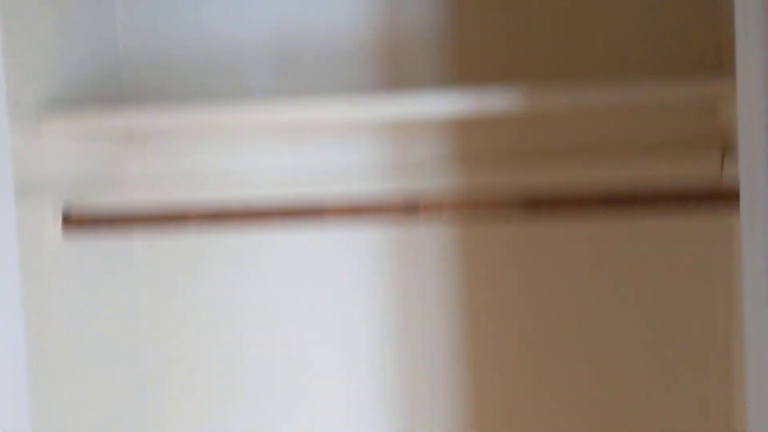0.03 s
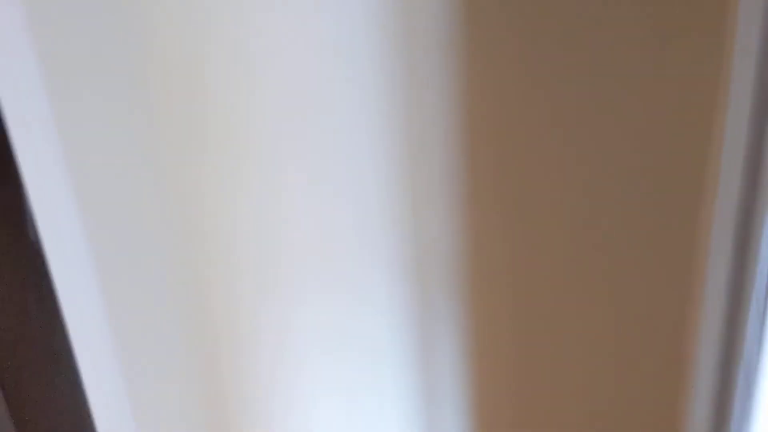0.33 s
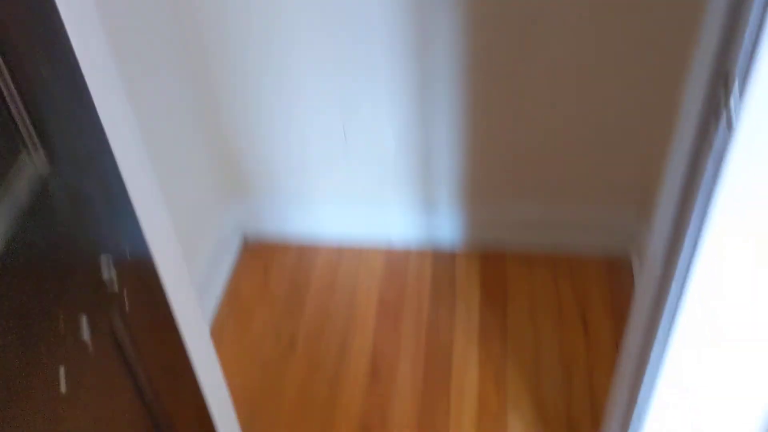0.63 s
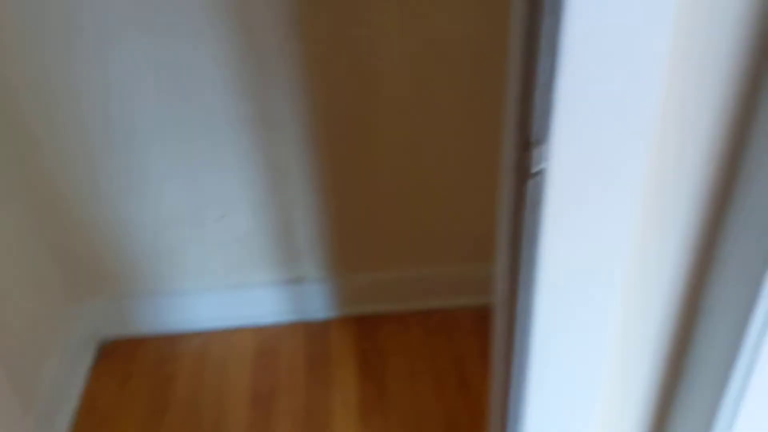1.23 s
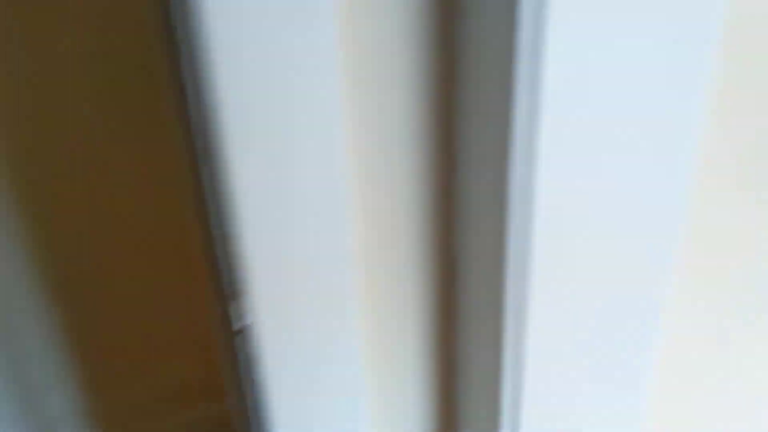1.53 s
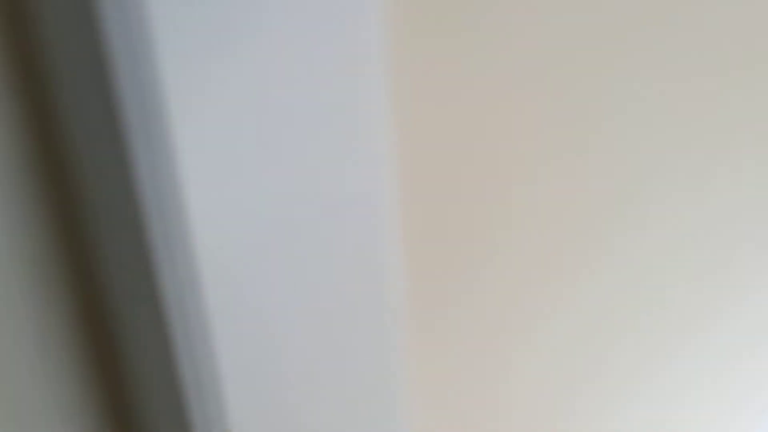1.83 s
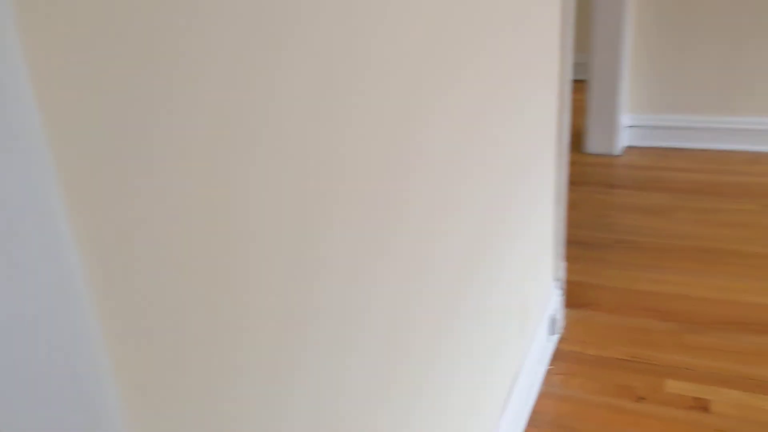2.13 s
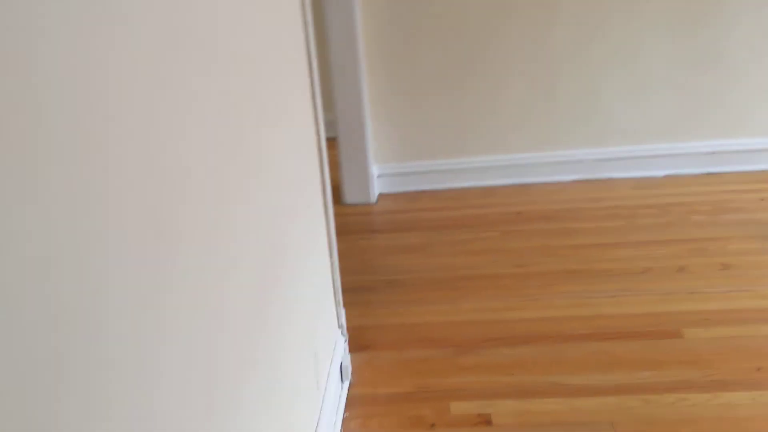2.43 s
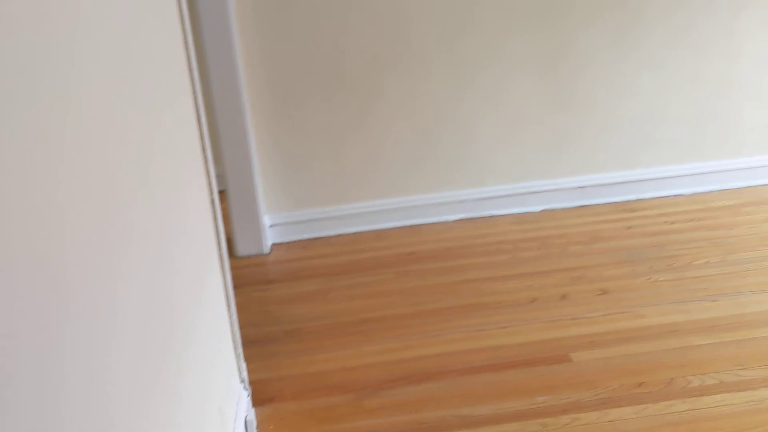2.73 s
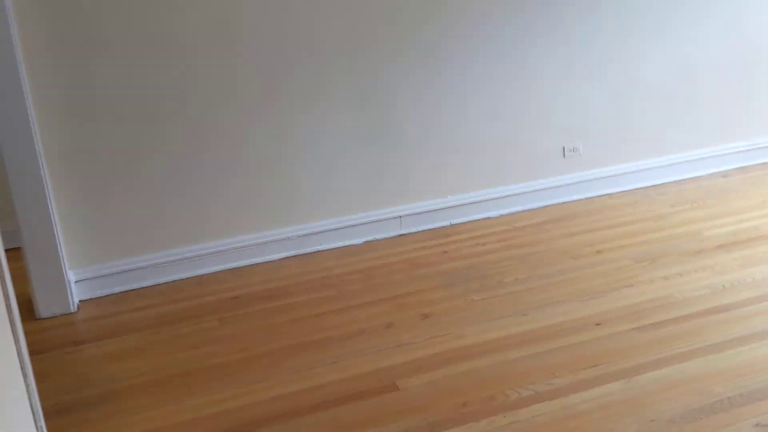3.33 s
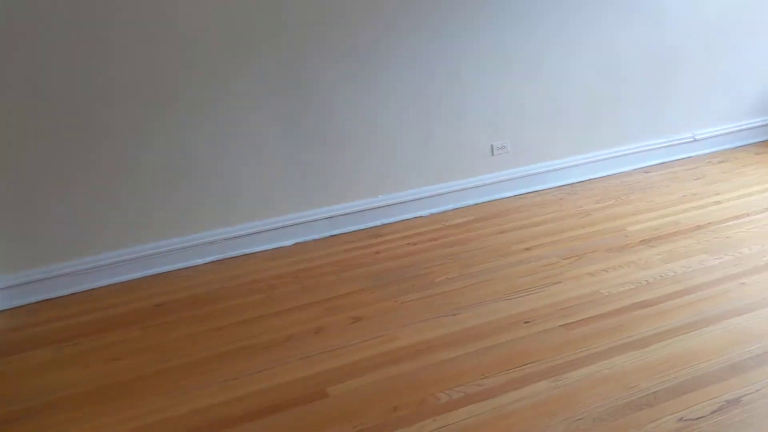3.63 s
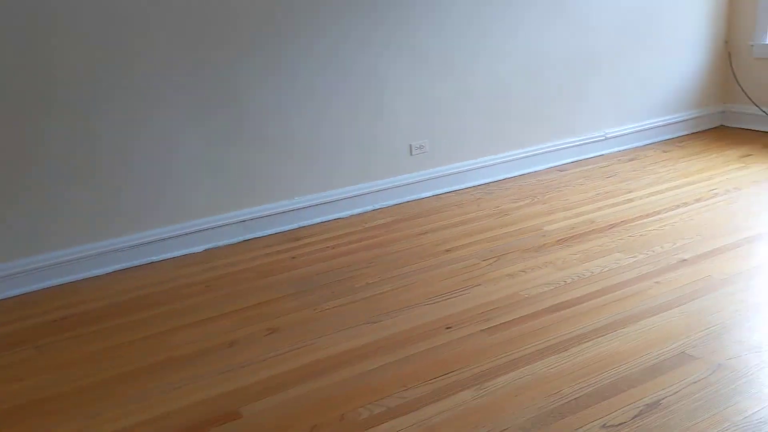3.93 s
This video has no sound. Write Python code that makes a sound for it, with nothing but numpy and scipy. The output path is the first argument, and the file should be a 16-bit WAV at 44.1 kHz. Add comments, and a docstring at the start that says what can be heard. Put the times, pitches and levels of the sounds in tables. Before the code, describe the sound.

A sharp, loud wooden knock with a deep thud lands at about 3 seconds and echoes briefly in an empty room. Before it, light shoe taps fall on a wooden floor near 0.4 and 1.7 seconds, with soft scuffs, and a squeak slides down and turns rough from 2.4 to 2.9 seconds. Faint scuffs return near the end. A low machine hum and soft hiss run underneath.

```python
"""A knock in an empty room

Shoes tap and scuff softly on a wooden floor. Wood sticks and slips in a squeak that slides down in
pitch, then a sharp knock leaves the wood ringing and sets off a deep thud. The bare walls add a
bright echo, and a low machine hum and a faint hiss lie underneath."""
import sys
import numpy as np
from scipy import signal
from scipy.fft import rfft, irfft
from scipy.io import wavfile

SR = 44100
rng = np.random.default_rng(int(sys.argv[2]) if len(sys.argv) > 2 else 0)


def digitize_waveform(pressure):
    """Quantize a signal to 16-bit integers and store it at the path in sys.argv[1].

    Rows of a 2-D input are taken as channels; values are limited to [-1, 1].
    """
    field = np.atleast_2d(pressure).T
    bounded = np.clip(field, -1, 1)
    quanta = np.round(bounded * 32767).astype(np.int16)
    wavfile.write(sys.argv[1], SR, quanta)


N = 176400  # 4 seconds


# The hits of the knock. Each row: start in seconds, level in dB, fade time in seconds,
# brightness in dB per octave.
KNOCK_HITS = [(2.9697, -31.5, 0.0054, 7.5), (2.9731, -23, 0.0021, 3), (2.9755, -24, 0.0028, 2),
              (2.9811, -19, 0.0067, 0.3), (2.996, -24.5, 0.01, -4)]
# The tone of each hit. Each row: frequency in Hz, relative level in dB.
KNOCK_COLOUR = [(60, 4), (150, 0), (330, -0.5), (520, -2.5), (1050, -2), (1350, -6), (1900, -1.5),
                (2450, -4.5), (2900, -4), (3400, -10), (4600, -12.5), (6800, -25), (11000, -31.5),
                (15500, -35)]
# The notes of the struck wood. Each row: pitch in Hz, level in dB, seconds to fade by 60 dB.
WOOD_NOTES = [(78.4, -22, 0.41), (104, -27, 0.31), (137, -17.5, 0.15), (177.2, -30, 0.37),
              (257.8, -26.5, 0.5), (296.6, -33, 0.4), (321, -29, 0.33), (420, -34.5, 0.35),
              (455, -37.5, .18), (626, -25.5, 0.34), (1085, -30, 0.14), (1616, -25.5, 0.033),
              (1962, -25.5, 0.067), (2857, -27, 0.1)]

def knock():
    """Several hard hits blur into one crack, and the wood rings on. Only the crack echoes."""
    crack, ring = np.zeros((2, N)), np.zeros((2, N))
    for start, db, decay, tilt_db in KNOCK_HITS:
        add(crack, start, burst(KNOCK_COLOUR, db, decay, tilt_db))
    add(ring, start=2.9725, sound=ringing(WOOD_NOTES))
    return (crack + ring) * pan(3.5) + amp(-5) * echo(crack)


def thud():
    """A deep swing that holds for a few cycles, then drops to a soft rumble."""
    start, hz, db = 2.9785, 34.58, -15.5
    rise_s, hold_s, fall_s, rumble_s = 0.016, 0.14, 0.021, 0.23
    t = np.maximum(np.arange(N) / SR - start, 0)
    late = np.maximum(t - hold_s, 0)
    rumble = amp(-14.5) * np.exp(-late / rumble_s)
    level = np.minimum(t / rise_s, 1) * np.maximum(np.exp(-late / fall_s), rumble)
    return -amp(db) * level * np.sin(2 * np.pi * hz * t) * pan(2.1)


# The squeak's slide. Each row: time in seconds, pitch in Hz, relative level in dB, roughness (0 to 1).
SQUEAK_PATH = [(2.428, 2065, -56, 0.1), (2.444, 2008, -47.5, 0.14), (2.49, 1990, -43.5, 0),
               (2.514, 1956, -49, 0.2), (2.521, 1883, -52, .5), (2.56, 1825, -42, 0.52),
               (2.6, 1663, -50, 0.59), (2.645, 1520, -47.5, 0.75), (2.675, 1376, -46, 0.93),
               (2.739, 1314, -57.5, 0.89), (2.785, 1259, -49.5, 0.8), (2.825, 1221, -56, 0.74),
               (2.87, 1220, -82, 0.86)]
# How well the wood gives off each frequency. Each row: frequency in Hz, boost or cut in dB.
SQUEAK_BODY = [(1250, -3), (1600, -3), (2000, 2.5), (2700, 4), (3300, -1.5), (3700, -9), (4000, -1),
               (4600, -3.5), (5500, -3), (6000, -7.5), (7000, -9), (8000, -30), (10000, -34), (12000, -31),
               (15000, -36)]
# The dry rubbing under the squeak. Each row: frequency in Hz, relative level in dB.
RUB_COLOUR = [(500, -30), (1300, -6), (1900, 3), (2700, -1), (3700, -6), (4600, -16), (5500, 2), (6800, -8),
              (8000, -16), (15000, -28)]

def squeak():
    """Wood sticks and slips: a clean whistle that turns rough as it slows and drops."""
    times, *columns = np.transpose(SQUEAK_PATH)
    t = np.arange(times[0], times[-1], 1 / SR)
    hz, db, rough = (np.interp(t, times, column) for column in columns)
    shaky_hz = hz * (1 + 0.028 * rough * wander(len(t), hz=400))
    cycles = np.cumsum(shaky_hz) / SR
    whistle = 0
    for k in range(1, 9):  # harmonics: whole multiples of the pitch
        dulling_db = 4 * rough * (k - 1.5)
        whistle += amp(read(SQUEAK_BODY, k * hz) - dulling_db) * np.sin(2 * np.pi * k * cycles)
    rub = amp(-8.5) * rough * noise(RUB_COLOUR, size=len(t))
    flutter_db = 4.5 * rough * wander(len(t), hz=80)
    sound = np.zeros((2, N))
    add(sound, times[0], np.sqrt(2) * (whistle + rub) * amp(db + flutter_db))
    return amp(-7.5) * pan(10.5) * sound + amp(-4.5) * pan(0.83) * echo(sound)


# The shoe taps. Each row: start in seconds, level in dB, fade time in seconds, brightness in dB
# per octave, then echo and floorboard ring, both in dB compared with the tap.
TAPS = [(.436, -37, 0.0042, 4, -2.5, -21), (.45, -41, 0.0099, -0.3, -3.5, -15),
        (1.505, -49, 0.0068, 12, -2, -25), (1.622, -33.5, 0.0068, -10, -0.5, -14),
        (1.7232, -34.5, .005, -6.5, -4.5, -4.5), (1.748, -38, 0.01, 1.5, -3.5, -5),
        (2.58, -48, 0.0071, -7, -9, -13)]
# The tone of a tap. Each row: frequency in Hz, relative level in dB.
TAP_COLOUR = [(100, -14), (350, -16), (900, 3), (1400, 3.5), (1850, 9.5), (2450, 3.5), (3100, 1),
              (3700, -2), (5500, -4), (7200, -15), (11000, -18), (15500, -33)]
# The floorboards' notes. Each row: pitch in Hz, relative level in dB, seconds to fade by 60 dB.
BOARD_NOTES = [(756, -4.5, 0.082), (1024, -2, 0.098), (1160, -2, 0.068), (1536, -7, 0.09), (1788, -3, 0.15),
               (2420, -9, 0.5)]

def shoe_taps():
    """Shoes land lightly and make the floorboards ring."""
    taps, to_walls = np.zeros((2, N)), np.zeros((2, N))
    for start, db, decay, tilt_db, echo_db, ring_db in TAPS:
        tap = burst(TAP_COLOUR, db, decay, tilt_db) + amp(db + ring_db) * ringing(BOARD_NOTES)
        add(taps, start, tap)
        add(to_walls, start, tap * amp(echo_db))
    return taps + echo(to_walls)


# The scuffs. Each row: loudest moment in seconds, relative level in dB, rise and fall in seconds,
# brightness in dB per octave.
SCUFFS = [(1.19, -54, 0.052, 0.05, -0.5), (1.39, -62, 0.037, .04, 1), (1.53, -55.5, 0.055, .06, 2),
          (1.625, -53.5, 0.021, 0.026, 0.5), (1.75, -52, 0.037, .06, 2), (1.92, -56.5, 0.046, 0.021, 2.5),
          (2.225, -54, 0.032, 0.032, 2), (2.64, -61, 0.28, 0.15, 2), (2.885, -64, 0.023, 0.024, 2),
          (3.749, -59, 0.063, 0.079, 1.5), (3.9, -57.5, 0.064, 0.084, 3.5)]
# The tone of a scuff. Each row: frequency in Hz, relative level in dB.
SCUFF_COLOUR = [(100, 4), (600, -2), (2200, -5.5), (3200, -11.5), (5500, -16), (7200, -24.5),
                (11000, -24.5), (15500, -29)]

def scuffs():
    """Soles and clothes brush, making soft noise that grows and fades."""
    t, brush = np.arange(N) / SR, np.zeros((2, N))
    for peak, db, rise, fall, tilt_db in SCUFFS:
        shape = np.exp(-((t - peak) / np.where(t < peak, rise, fall)) ** 2)
        brush += amp(db + 5) * shape * noise(SCUFF_COLOUR, tilt_db)
    return brush + amp(-1.5) * echo(brush)


# How long the echo lasts. Each row: frequency in Hz, seconds to fade by 60 dB.
ECHO_TIMES = [(60, 0.62), (250, 1), (1000, 0.95), (2500, 0.85), (5000, 0.66), (9000, 0.54), (15000, 0.2)]

def echo(sound):
    """Bare walls send back many reflections, each frequency fading at its own speed."""
    hz, t, bands = signal.stft(rng.standard_normal((2, SR)), SR, nperseg=256)
    fade = amp(-60 * t / read(ECHO_TIMES, hz)[:, None])
    build_up = np.minimum(t / 0.0067, 1)
    tail = signal.istft(bands * fade * build_up, SR, nperseg=256)[1]
    return signal.fftconvolve(sound, stereo(tail) / np.linalg.norm(tail[0]), axes=1)[:, :N]


# The tones of the hum. Each row: pitch in Hz, level in dB, typical pitch drift in Hz.
HUM_TONES = [(31.104, -44.5, 1.49), (42.8, -56.5, 1.72), (59, -49, 0.66), (121, -58.5, 0.64),
             (141.5, -62.5, 2.1), (267.5, -66.5, 5.77), (640, -61.5, 20), (715, -66, 15)]

def machine_hum():
    """A machine in the building hums with several wavering tones."""
    hum = sum(amp(db) * tone(hz + drift * wander(N, hz=4.95)) for hz, db, drift in HUM_TONES)
    return hum * pan(3.4)


# The swells. Each row: loudest moment in seconds, half length in seconds, pitch in Hz, level in dB.
SWELLS = [(0.313, 0.23, 71, -43), (0.43, 0.13, 274.8, -54.5), (0.694, .07, 280, -54.5),
          (1.204, 0.16, 285, -53), (2.557, 0.18, 318, -57)]

def low_swells():
    """Low, wavering tones briefly grow and fade."""
    t, swells = np.arange(N) / SR, np.zeros(N)
    for peak, half, hz, db in SWELLS:
        shape = np.exp(-((t - peak) / half) ** 2)
        swells += amp(db) * shape * tone(hz * (1 + 0.023 * wander(N, hz=6.6)))
    return swells * pan(3.4)


# The tone of the room's air. Each row: frequency in Hz, relative level in dB.
AIR_COLOUR = [(20, -1), (50, -8), (90, -1.5), (140, -7), (200, -8.5), (270, -6.5), (400, -9.5), (520, -7),
              (640, -6), (760, -10), (1000, -7), (1240, -11.5), (1600, -12.5), (2100, -12), (2550, -16.5),
              (3400, -25), (4400, -26), (5600, -30.5), (7100, -39), (11000, -39.5), (15500, -40)]
# How loud the hiss is. Each row: time in seconds, level in dB.
HISS_LEVELS = [(0, -76), (1, -75), (2, -74), (2.95, -71.5), (3.25, -99), (3.45, -82), (3.65, -72), (4, -85)]
# The tone of the hiss. Each row: frequency in Hz, relative level in dB.
HISS_COLOUR = [(3000, -26), (7000, 3), (11000, 10), (15500, -1)]

def room_air():
    """A steady, soft rush, plus a faint high hiss that dips after the knock."""
    hiss_db = np.interp(np.arange(N) / SR, *np.transpose(HISS_LEVELS))
    return amp(-48.5) * noise(AIR_COLOUR) + amp(hiss_db) * noise(HISS_COLOUR)


def burst(colour, db, decay, tilt_db):
    """One hit: a sudden crunch of noise that dies quickly."""
    t, hz = np.arange(SR) / SR, np.fft.rfftfreq(SR, 1 / SR)
    fade = np.exp(-t / decay / 2)  # applied twice below
    raw = fade * noise(colour, tilt_db, size=SR)
    # Keep the noise's timing but smooth out the chance peaks in its tone.
    phases = np.exp(1j * np.angle(rfft(raw)))
    crunch = fade * irfft(colour_gain(colour, tilt_db, hz) * phases, SR)
    return amp(db) * np.sqrt(decay / 2) * normalise(crunch)


def ringing(notes):
    """Struck wood rings with fading notes, slightly out of step between left and right."""
    t, ring = np.arange(SR) / SR, np.zeros((2, SR))
    for hz, db, fade_s in notes:
        delay_s = abs(0.00039 * rng.standard_normal((2, 1)))
        ring += amp(db - 60 * t / fade_s) * np.sin(2 * np.pi * hz * np.maximum(t - delay_s, 0))
    return ring


# How alike left and right are. Each row: frequency in Hz, likeness (1 is the same, 0 is unrelated).
LIKENESS = [(60, 0.94), (130, 1), (290, 0.87), (640, 0.5), (1400, -0.24), (3100, 0.13), (15000, -0.084)]
# Which side is louder. Each row: frequency in Hz, left minus right in dB.
BALANCE = [(100, 0.5), (350, 1), (700, 1.5), (1300, -1), (2400, -1), (4400, 2), (8000, -.5), (15000, -1.5)]

def stereo(pair):
    """Blends two unrelated noises so that left and right are alike in the bass."""
    hz = np.fft.rfftfreq(pair.shape[1], 1 / SR)
    left, other = rfft(pair)
    same = read(LIKENESS, hz)
    right = same * left + np.sqrt(1 - same ** 2) * other
    lean = amp(read(BALANCE, hz) / 2)
    return irfft(np.array([left * lean, right / lean]), pair.shape[1])


def noise(colour, tilt_db=0, size=N):
    """Stereo noise of strength 1, shaped by a colour table."""
    gain = colour_gain(colour, tilt_db, np.fft.rfftfreq(size, 1 / SR))
    white = rng.standard_normal((2, size))
    return normalise(stereo(irfft(rfft(white) * gain, size)))


def colour_gain(colour, tilt_db, hz):
    """A colour table as gains, tilted by tilt_db per octave above 250 Hz."""
    return amp(read(colour, hz) + tilt_db * np.log2(np.maximum(hz, 250)))


def tone(hz):
    """A pure tone of strength 1 that follows a changing pitch."""
    return np.sqrt(2) * np.sin(2 * np.pi * (np.cumsum(hz) / SR + rng.random()))


def wander(size, hz):
    """A smooth random wobble, up to about hz times a second."""
    smoothing = 1 + (np.fft.rfftfreq(N, 1 / SR) / hz) ** 4
    return normalise(irfft(rfft(rng.standard_normal(N)) / smoothing, N))[:size]


def amp(db):
    """Turns decibels into a gain to multiply by."""
    return 10 ** (np.asarray(db) / 20)


def normalise(sound):
    """Scales a sound to an average strength (rms) of 1."""
    return sound / np.sqrt(np.mean(sound ** 2) + 1e-20)


def read(table, hz):
    """Looks up a frequency in a table, gliding between rows on an octave scale."""
    row_hz, values = np.transpose(table)
    return np.interp(np.log(hz + 1), np.log(row_hz), values)


def add(mix, start, sound):
    """Adds a sound to the mix at a start time in seconds."""
    part = mix[:, round(start * SR):][:, :sound.shape[-1]]
    part += sound[..., :part.shape[-1]]


def pan(db):
    """Gains that make the left side db decibels louder than the right."""
    return amp(np.array([[db], [-db]]) / 2)


def scene():
    """All the sounds together."""
    events = knock() + thud() + squeak() + shoe_taps() + scuffs()
    return events + machine_hum() + low_swells() + room_air()


def record(dry):
    """Cuts the highest treble, above 15800 Hz."""
    lowpass = signal.firwin(511, 15800, window=("kaiser", 9), fs=SR)
    return signal.oaconvolve(dry, lowpass[None], "same")


dry = scene()
out = record(dry)
digitize_waveform(out)
```